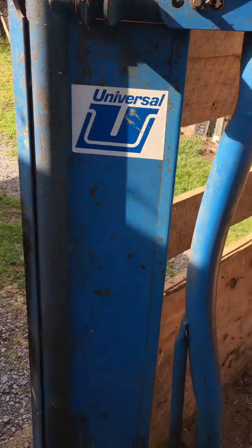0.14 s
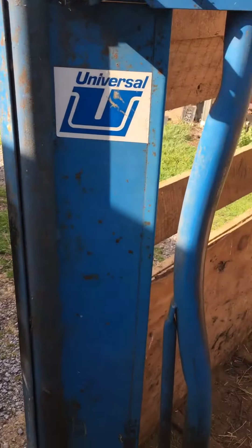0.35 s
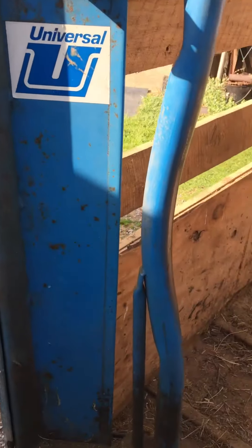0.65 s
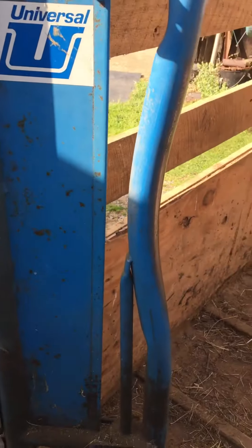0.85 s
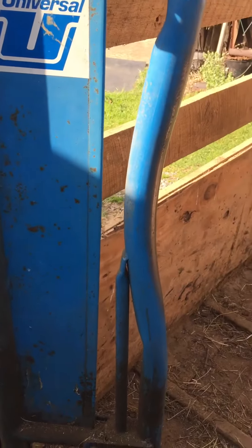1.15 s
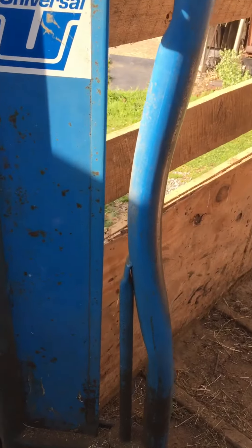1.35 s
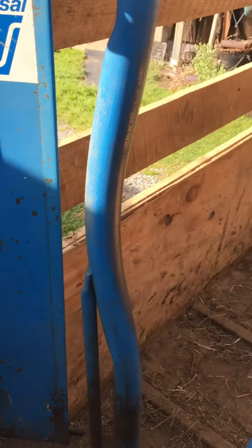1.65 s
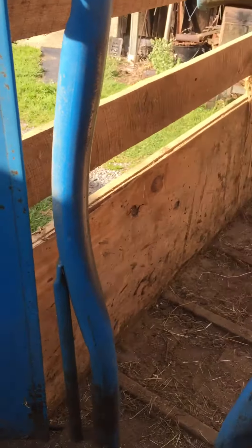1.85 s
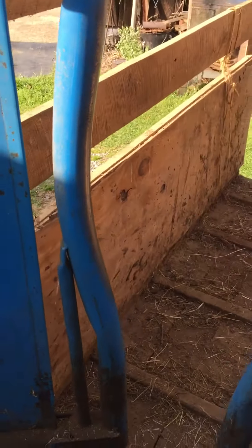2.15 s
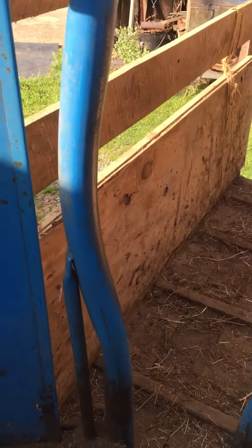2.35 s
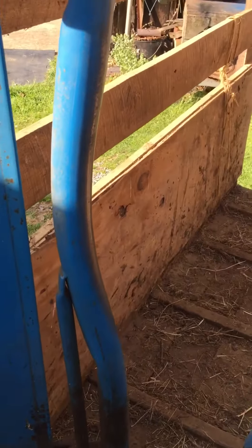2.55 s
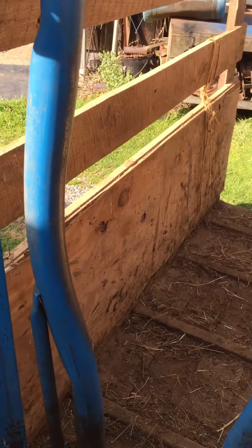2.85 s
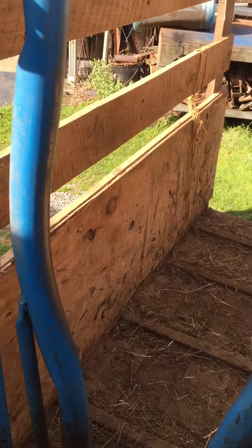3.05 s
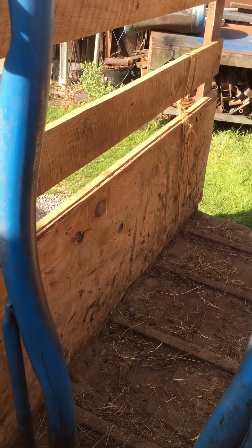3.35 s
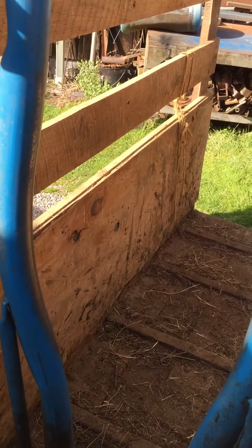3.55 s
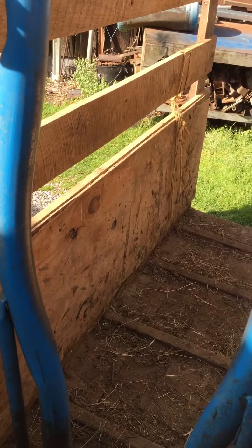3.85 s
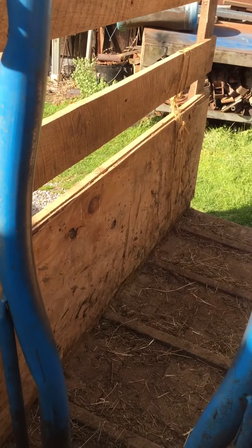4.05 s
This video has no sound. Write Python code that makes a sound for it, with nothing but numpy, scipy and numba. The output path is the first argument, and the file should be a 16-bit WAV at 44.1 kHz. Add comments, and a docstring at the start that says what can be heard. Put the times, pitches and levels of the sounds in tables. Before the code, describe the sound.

Close, dry outdoor metal sounds: a dense burst of door slams with hollow low boom, bright shorter latch clacks, then near quiet. Swinging doors scrape softly before a second hard clang, which leaves a deep steady hum dying away. Finally small dull clinks of loose parts scatter irregularly over faint outdoor hush, caught by a phone at arm's length.

```python
"""Doors slam in bursts of chatter, a latch clinks, loose parts tick and a tube frame booms; a long bar hums on.
The place is a quiet farmyard: a steel cattle head gate is worked a step from a phone's microphone.
Short runs of contacts set off damped modes for the blows, ticks and boom; the bar is one swelling, dying sine.
Bands of noise make the low rumble, the scrapes of swinging doors and a dull middle hush around blows and
ticks; a faint outdoor hush lies behind."""
import sys
import numpy as np
from scipy import signal
from scipy.fft import rfft, irfft
from scipy.io import wavfile
from scipy.ndimage import uniform_filter1d
from numba import njit

SR = 44100
rng = np.random.default_rng(int(sys.argv[2]) if len(sys.argv) > 2 else 0)


def persist_wave(psi):
    """Save psi, clipped to +-1, as 16-bit WAV."""
    counts = np.round(np.clip(psi, -1, 1) * 32767).astype(np.int16)
    wavfile.write(sys.argv[1], SR, np.atleast_2d(counts).T)


N = 185616
T = np.arange(N) / SR  # time [s]

# Blows of the doors; then blows of the latch, with two clinks of another small part at .606 and 1.059 s:
# (time [s], relative clatter level at the corner [dB], corner [Hz],
# slope up to the corner [dB per octave], chatter [s], base clatter t60 at 2 kHz [s], place [0 = top, 1 = foot])
DOOR_BLOWS = [(.034, -31, 2400, -3.5, 0.0056, .058, 1), (.127, -9, 2660, 9.5, 0.0076, .11, .32),
              (.132, -0.5, 2480, 4, 0.0093, .048, .61), (.141, -6.5, 9000, -1, 0.01, .068, .24),
              (.152, -9, 6440, 3.5, 0.0084, .2, .14), (.181, -9, 3040, 7, 0.018, .19, .7),
              (.214, -21, 6500, -2.5, 0.0091, .16, .97), (.345, -37, 2500, -6, 0.0058, .1, .42),
              (.394, -42, 6500, -7.5, 0.0042, .072, .81), (1.377, -27, 13000, 1.3, .009, 0.054, .66),
              (2.096, -39, 6500, 0.7, 0.0095, .085, .75), (2.22, -40.5, 2500, -1.3, 0.019, .12, 1),
              (2.246, -47.5, 5950, -5, 0.007, .085, .4), (2.513, -21.5, 5960, 1, 0.012, .26, .4),
              (2.524, -7, 2700, 6, 0.014, .086, .4), (2.536, -6.5, 7060, -1, 0.0035, .07, .94),
              (2.645, -32.5, 6600, 0.7, 0.012, .3, .65), (2.809, -46, 6050, 0.5, 0.006, .087, .53)]
LATCH_AND_SMALL_PART_BLOWS = [(.606, -29, 3310, 0, 0.01, 0.057, 0.45),
                              (.647, -7.5, 4700, 2, 0.013, 0.069, 0),
                              (.745, -33, 4000, -2, 0.023, 0.034, 0.5),
                              (.783, -26.5, 4970, -1.5, 0.014, 0.18, .53),
                              (.804, -5, 5970, 1, 0.0047, 0.045, .7),
                              (1.059, -36, 3400, -0.5, 0.011, 0.04, 0.5),
                              (1.252, -57.5, 8990, .3, .011, 0.067, 0.54)]
# Clear modes for each of these: (pitch [Hz], level struck at the top [dB], level struck at the foot [dB], t60 [s])
DOOR_MODES = [(483, -28, -12.5, 0.38), (590, -13.5, -2, 0.11), (645, -21, -14.5, 0.25),
              (814, -21.5, -12.5, 0.07), (890, -12.5, -18, 0.28), (912, -31, -23.5, 1),
              (960, -11.5, -12, 0.18), (1083, -17, -2.5, 0.28), (1226, -4.5, -15, 0.2),
              (1496, -13, -11, 0.3), (1905, -3.5, -21.5, 0.13), (1960, -30, -27, .5),
              (2570, -17.5, -18.5, 0.11), (2810, -3, -22.5, 0.24), (3176, -34, -28, .33),
              (3400, -27.5, -30.5, 0.71), (3333, -27, -31, 0.94), (3400, -26.5, -31, 1),
              (4000, -22.5, -26.5, 0.13), (4120, -1.5, -25.5, 0.28), (4400, 0, -29.5, .15),
              (5060, -25, -33, 0.21), (7070, -7, -21, .12), (8400, -29, -35, 0.31)]
SMALL_METAL_MODES = [ (1136, -13, -20, .15), (1373, -20, -14, .12), (1776, -10, -20, .09),
                     (2180, -5, -10, .1), (2740, -11, -15, .13), (2923, -8, -20, .07), (3670, -22, -6, .15),
                     (4060, -10, -22, .08), (4652, 0, -15, .11), (5150, -13, -18, .08),
                     (5520, -18, -3, .12), (5785, -6, -25, .09), (5890, -9, -18, .14),
                     (9345, -20, -12, .08), (11560, -28, -16, .08)]
# Build for each: (ring re clatter at t60 0.1 s [dB], ring gained per doubling of clatter t60 [dB],
# treble loss [exponent])
DOOR_BUILD = (-14, 6, 0.42)
SMALL_METAL_BUILD = (-8.5, 0.3, 0.59)
# Clinks of loose parts: (time [s], relative level [dB], clink [Hz], fall above it [dB per octave],
# base t60 at 2 kHz [s])
TICKS = [(1.411, -27.5, 910, 2, 0.035), (1.453, -44, 848, 2, .045), (1.787, -48, 3730, 14, .034),
         (1.898, -41, 2520, 10, 0.071), (3.169, -49, 2120, 7, 0.11), (3.221, -32.5, 2100, 25, 0.07),
         (3.324, -38, 1175, 11.5, 0.06), (3.345, -37.5, 3870, 0.5, 0.033), (3.452, -31.5, 713, 5, 0.054),
         (3.47, -25, 1145, 2.5, 0.04), (3.496, -33.5, 1090, 6, 0.06), (3.524, -31, 2020, 8.5, 0.048),
         (3.594, -28, 1100, 5, 0.066), (3.621, -23, 1340, 5.5, 0.045), (3.642, -33.5, 2670, 9, 0.022),
         (3.704, -38, 1266, 18, .12), (3.755, -36.5, 1300, 21, 0.034), (3.808, -46, 1290, 1.5, 0.071),
         (3.836, -31.5, 1260, 5, 0.038), (3.918, -33.5, 673, 4.5, 0.05), (3.931, -33.5, 1084, 3.5, 0.038),
         (4.103, -35.5, 1890, 1.5, 0.034)]
# Jolts of the frame: (time [s], relative level [dB], favoured pitch [Hz], t60 [s])
JOLTS = [(0.0, -31.5, 184.7, 0.5), (.106, -30.5, 209, .49), (.142, -10.5, 270, .64), (.188, -23, 153, 0.74),
         (.347, -26.5, 195, 0.43), (0.649, -28, 165, 1), (.811, -20, 156.4, 0.6), (.857, -20.5, 167, 0.32),
         (1.374, -29.5, 293, .13), (1.426, -61, 144.3, 0.28), (2.014, -29.5, 281, 0.54),
         (2.098, -35, 275.5, .65), (2.216, -23, 314, 0.53), (2.248, -28.5, 265, 0.71),
         (2.535, -11, 274.5, 0.36), (2.579, -26, 278, 0.88), (3.219, -45, 420, .3), (3.457, -43.5, 412, .2),
         (3.616, -41.5, 406, .2), (3.732, -48.5, 400, .15)]
# Boom modes of the tube frame: (centre pitch [Hz], relative level [dB])
FRAME_MODES = [(80, 4), (118, -2.5), (152, 2.5), (194, 2), (248, -0.5), (285, 1), (315, -2), (355, -8.5)]
# Swells of noise: scrapes with treble as a door swings, and (first two and last two rows) dull middle hush
# around blows and ticks: (start [s], loudest [s], end [s], middle level [dB], treble level [dB])
NOISE_SWELLS = [(-.05, -0.002, 0.52, -55, -80), (0.246, .4, 1.3, -73.5, -98),
                (0.932, 1.006, 1.047, -57.5, -54), (1.663, 1.87, 2.05, -65.5, -63.5),
                (2.0, 2.028, 2.32, -65.5, -67), (2.206, 2.246, 2.3, -57, -68),
                (2.286, 2.45, 2.51, -53.5, -61), (3.377, 3.5, 3.63, -60.5, -84), (3.67, 3.74, 4, -67, -92)]
# Spectrum of the outdoor hush: (frequency [Hz], relative density [dB per Hz])
HUSH_SPECTRUM = [(18, -57), (30, -18.5), (138, 0), (184, -26), (252, -3.5), (449, -27.5), (721, -17.5),
                 (962, -16), (9460, -35.5), (16000, -43.5)]

# above the corner the clatter falls [dB per octave], faster for each dB that a blow is below 0 dB
FALL_DB, SOFTER_FALL_DB = 10, 0.55
TICK_CHATTER = 0.13  # the chatter lasts this share of a tick's base t60
CHUTE_DB, CHUTE_T60_S = -12, 0.18  # sound scattered back by planks and rails
BAR_S, BAR_HZ, BAR_DB, BAR_T60_S = 2.54, 133, -26.5, 2
# rumble for a 0 dB jolt, share of the jolt's dB that it follows, swell time constant, t60
ROCK_DB, ROCK_SHARE, ROCK_RISE_S, ROCK_T60_S = -25.5, 0.82, 0.013, 1.2
SHUDDER_DB, SHUDDER_T60_S = -4.5, 1.7  # the ground under the frame, level re the rumble
HUSH_DB = -62.5
TOP_HZ = 15700  # upper limit of the microphone


def struck(blows, modes, build):
    """Blows on metal: a crowd of modes coloured by the blow, and clear modes weighted by the place struck."""
    out = np.zeros(N)
    mode_hz, top_db, foot_db, mode_t60 = np.transpose(modes)
    ring_db, longer_db, treble_loss = build
    for s, db, corner_hz, slope_db, chatter_s, life, place in blows:
        fall_db = FALL_DB - SOFTER_FALL_DB * db
        crowd_hz, crowd_t60 = crowd(count=360, t60=life, treble_loss=treble_loss)
        octaves = np.log2(crowd_hz / corner_hz)
        colour_db = np.where(octaves < 0, slope_db, -fall_db) * octaves
        add(out, s, ring(crowd_hz, db - 23.5 + colour_db, crowd_t60, chatter_s, scatter_db=2.4))

        place = np.clip(place, 0, 1)
        place_db = (1 - place) * top_db + place * foot_db
        clear_db = db + ring_db + longer_db * np.log2(10 * life) + place_db
        clear_db -= 0.44 * fall_db * np.maximum(np.log2(mode_hz / corner_hz), 0)
        add(out, s, ring(mode_hz, clear_db, mode_t60, chatter_s / 2, scatter_db=1.5))
    return out


def ticks():
    """Loose pins and chain links: short modes that crowd round one clink, with little extreme treble."""
    out = np.zeros(N)
    for s, db, clink_hz, fall_db, life in TICKS:
        hz, t60 = crowd(count=200, t60=life, treble_loss=0.11)
        octaves = np.log2(hz / clink_hz)
        lean_db = np.where(octaves > 0, -fall_db * octaves, 5.3 * octaves)
        lean_db -= 18.6 * np.maximum(np.log2(hz / 6000), 0)
        chatter_s = TICK_CHATTER * life
        add(out, s, ring(hz, db - 27 + lean_db, t60, chatter_s, scatter_db=3.5))
        clink = ring(np.array([clink_hz]), db - 6, np.array([0.49 * life]), chatter_s / 2, scatter_db=0.59)
        add(out, s, clink)
    return out


def chute(x):
    """Planks and rails close by scatter each blow into a short dense tail of decaying noise."""
    t = T[:int(.5 * SR)]
    grain = signal.lfilter([1], [1, -.3], rng.standard_normal(len(t)))
    tail = grain * np.exp(-np.log(1000) * t / CHUTE_T60_S)
    tail /= np.sqrt(np.sum(tail ** 2))
    return x + undb(CHUTE_DB) * signal.fftconvolve(x, tail)[:N]


def frame():
    """Each jolt booms in the tube frame, most near its favoured pitch; twin tubes beat against each other."""
    out = np.zeros(N)
    hz, mode_db = np.repeat(np.transpose(FRAME_MODES), 2, axis=1)
    twin_db = np.tile([0, -7], len(FRAME_MODES))  # the far twin is fainter
    for s, db, pitch, t60 in JOLTS:
        detuned_hz = hz * (1 + .018 * rng.standard_normal(len(hz)))
        lean_db = -13.0 * np.abs(np.log2(hz / pitch)) + twin_db
        level_db = db - 7 + mode_db + lean_db
        add(out, s, ring(detuned_hz, level_db, np.full(len(hz), t60), chatter_s=.001, scatter_db=1.5))
    # heavy, soft contacts carry no treble
    return signal.sosfilt(signal.butter(2, [60, 550], "band", fs=SR, output="sos"), out)


def bar():
    """The long bar swells in at the last slam and hums out as a decaying sine, wavering a little."""
    t = np.maximum(T - BAR_S, 0)
    shape = np.exp(-np.log(1000) * t / BAR_T60_S) * (1 - np.exp(-t / 0.026))
    return undb(BAR_DB) * flicker(7.8, 0.61) * shape * np.sin(2 * np.pi * BAR_HZ * t)


def rocking():
    """Jolts rock the frame on its footing: low rumble and a deeper ground shudder swell in and die away."""
    s, db = np.transpose(JOLTS)[:2, :, None]
    t = np.maximum(T - s, 0)
    swell = undb(ROCK_DB + ROCK_SHARE * db) * (1 - np.exp(-t / ROCK_RISE_S))

    def dying(t60):
        """Jolts add up by energy while each one decays."""
        return np.sqrt(np.sum((swell * np.exp(-np.log(1000) * t / t60)) ** 2, axis=0))

    rumble = dying(ROCK_T60_S) * band(59, 280)
    shudder = undb(SHUDDER_DB) * dying(SHUDDER_T60_S) * band(50, 120)
    return flicker(40, 3.9) * (rumble + shudder)


def noise_swells():
    """Scrapes of swinging doors and dull hush around blows and ticks: grainy middle and airy treble noise."""
    gain = np.zeros((2, N))
    for start, loudest, end, *db in NOISE_SWELLS:
        gain += np.outer(undb(db), np.interp(T, [start, loudest, end], [0, 1, 0]))
    middle = gain[0] * flicker(86, 0.62) * band(880, 3000, order=1)
    treble = gain[1] * flicker(20, 1.2) * band(3300, 15000, order=1)
    return middle + treble


def hush():
    """Distant outdoor noise: white noise shaped by a fixed spectrum, its level wandering slowly."""
    hz, db = np.transpose(HUSH_SPECTRUM)
    f = np.arange(1, N // 2 + 2) * SR / N
    shape = undb(np.interp(np.log(f), np.log(hz), db))
    noise = irfft(rfft(rng.standard_normal(N)) * shape, N)
    return undb(HUSH_DB) * unit(noise) * flicker(1.9, 0.77)


def crowd(count, t60, treble_loss):
    """Many unnamed modes of plates and tubes; a few ring on longer, the treble dies first."""
    chance = rng.random((count, 2)).T
    hz = 470 * (16000 / 470) ** (chance[0] ** .7)
    longer = (1 - .97 * chance[1]) ** -.1
    return hz, t60 * (hz / 2000) ** -treble_loss * longer


def ring(hz, db, t60, chatter_s, scatter_db):
    """Modes set off by a run of uneven small contacts that dies away; every blow finds its own strengths."""
    t60, chatter_s = np.clip(t60, .008, 3), np.clip(chatter_s, .0004, .03)
    t = T[:4096]
    dying = np.exp(-np.maximum(t - chatter_s, 0) / (0.48 * chatter_s))
    push = rng.standard_normal(len(t)) ** 3 * dying
    push = push[:int(3 * chatter_s * SR)]
    hz = np.minimum(hz, .45 * SR)
    # even out the modes, whichever pitches the contacts happen to favour
    spectrum = np.abs(rfft(push, 16384))
    reach = spectrum[(hz / SR * 16384).astype(int)] + .25 * np.sqrt(np.sum(push ** 2))
    chance = rng.standard_normal((len(hz), 2)).T
    gain = undb(db + scatter_db * chance[0]) * np.sign(chance[1]) / reach
    pole = np.exp(2j * np.pi * hz / SR - np.log(1000) / (t60 * SR))
    length = len(push) + (1.2 * t60 * SR).astype(int)
    return resonate(push, pole, gain, length)


@njit
def resonate(push, pole, gain, length):
    """A bank of damped oscillators driven by one short push, each run until it has died."""
    out = np.zeros(length.max())
    for k in range(len(pole)):
        z = 0j
        for i in range(length[k]):
            z = z * pole[k] + (push[i] if i < len(push) else 0.)
            out[i] += gain[k] * z.imag
    return out


def flicker(rate, db):
    """A gain that wanders with an rms of `db`, drawing a new random level `rate` times a second."""
    k = int(SR / rate)
    steps = np.repeat(rng.standard_normal(N // k + 1), k)[:N]
    return undb(db * unit(uniform_filter1d(steps, k)))


def band(lo_hz, hi_hz, order=2):
    """Steady noise in a band, rms 1."""
    sos = signal.butter(order, [lo_hz, min(hi_hz, .45 * SR)], "band", fs=SR, output="sos")
    return unit(signal.sosfilt(sos, rng.standard_normal(N)))


def undb(db):
    """Amplitude ratio of a level in dB."""
    return 10 ** (np.asarray(db) / 20)


def unit(x):
    """Scale a signal to rms 1."""
    return x / np.sqrt(np.mean(x ** 2))


def add(out, s, x):
    """Mix a sound in at `s` seconds, cut off at the end of the scene."""
    i = int(s * SR)
    out[i:i + len(x)] += x[:N - i]


def scene():
    """Blows and ticks with their scattered tail, then the frame, bar, rumble, noise swells and farmyard hush."""
    doors = struck(DOOR_BLOWS, DOOR_MODES, DOOR_BUILD)
    small_metal = struck(LATCH_AND_SMALL_PART_BLOWS, SMALL_METAL_MODES, SMALL_METAL_BUILD)
    metal = chute(doors + small_metal + ticks())
    return (metal + frame() + bar() + rocking() + noise_swells() + hush())[None]


def record(dry):
    """The phone's microphone loses the deep bass, rounds the loudest peaks and cuts the top."""
    no_bass = signal.sosfilt(signal.butter(3, 42, "high", fs=SR, output="sos"), dry)
    rounded = no_bass / (1 + np.abs(no_bass) ** 4) ** .25
    return signal.sosfilt(signal.ellip(10, .2, 70, TOP_HZ, fs=SR, output="sos"), rounded)


dry = scene()
out = record(dry)
persist_wave(out)
```